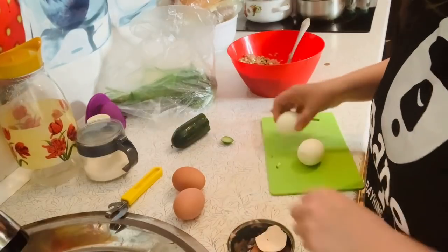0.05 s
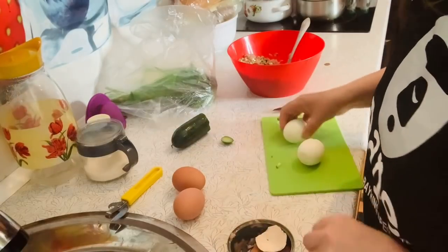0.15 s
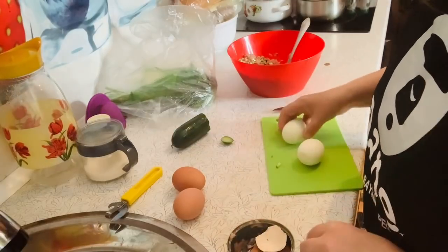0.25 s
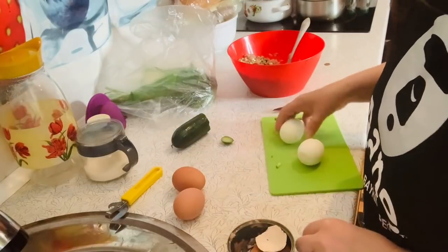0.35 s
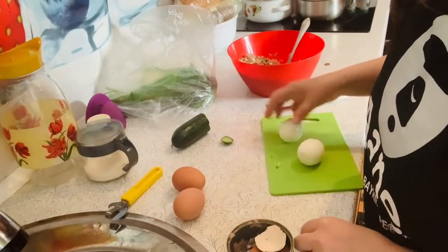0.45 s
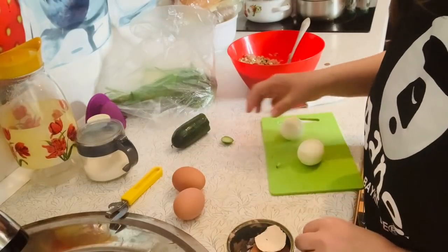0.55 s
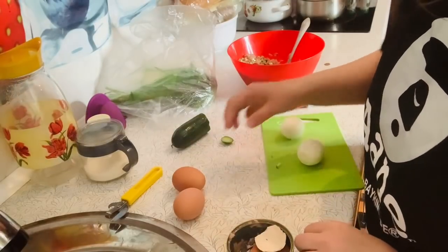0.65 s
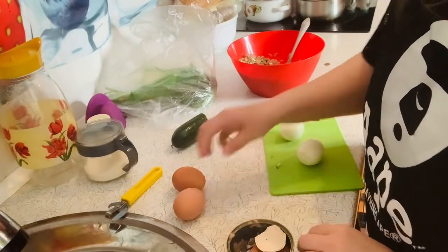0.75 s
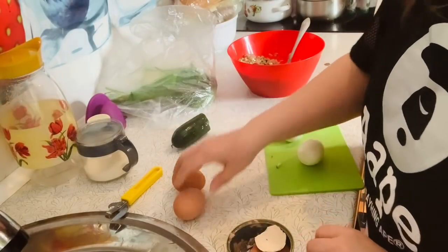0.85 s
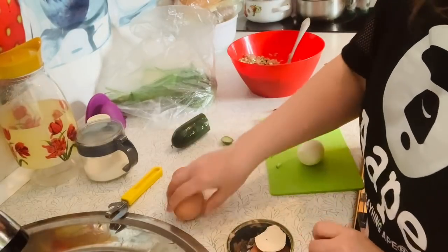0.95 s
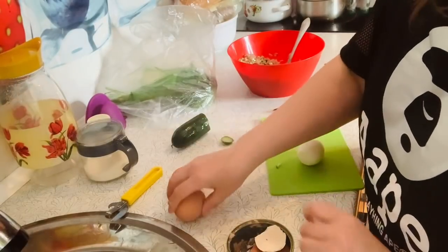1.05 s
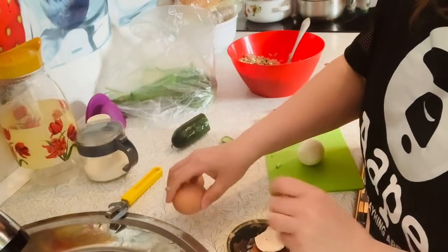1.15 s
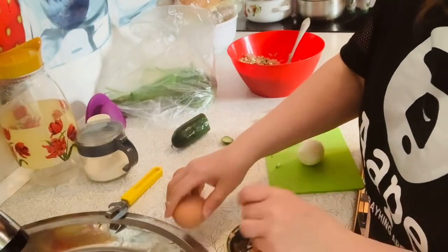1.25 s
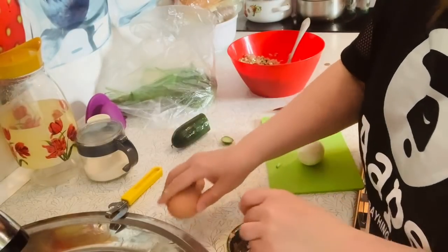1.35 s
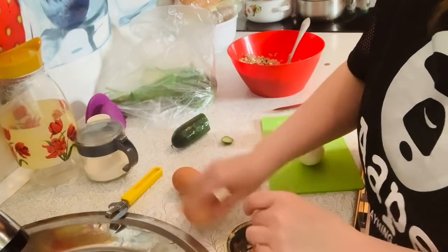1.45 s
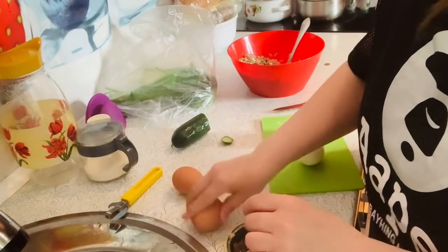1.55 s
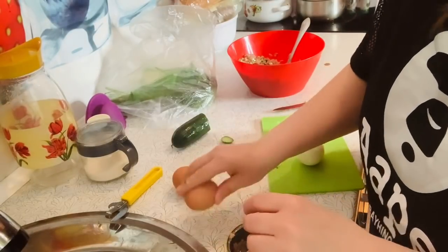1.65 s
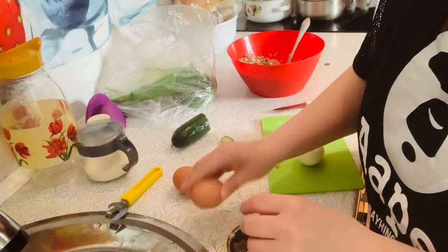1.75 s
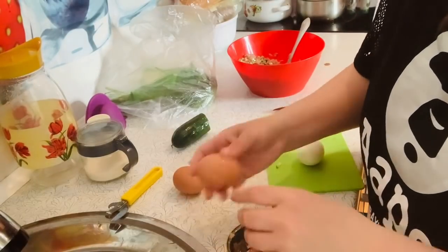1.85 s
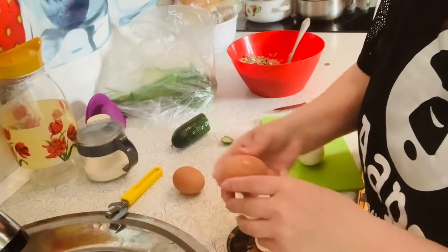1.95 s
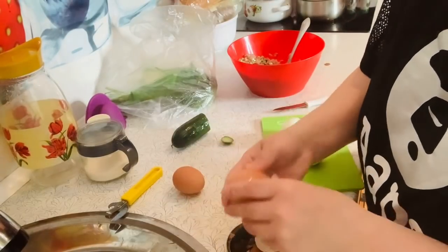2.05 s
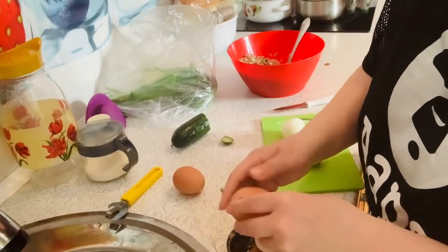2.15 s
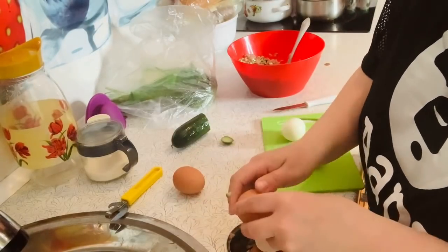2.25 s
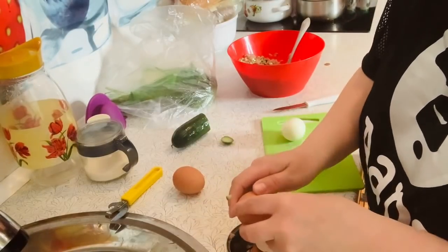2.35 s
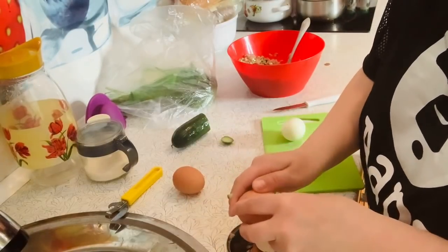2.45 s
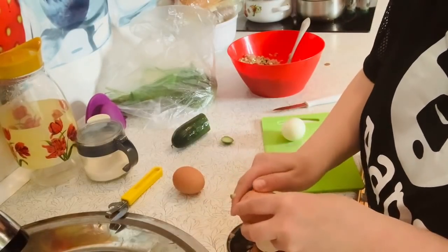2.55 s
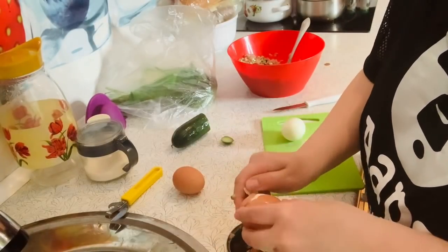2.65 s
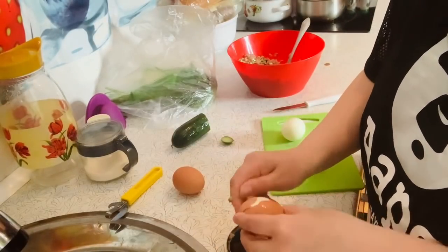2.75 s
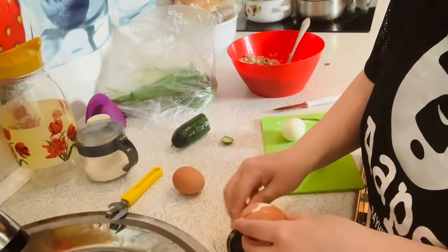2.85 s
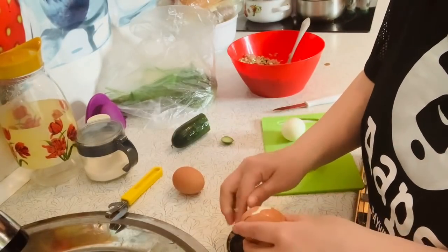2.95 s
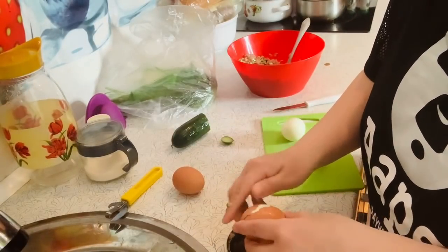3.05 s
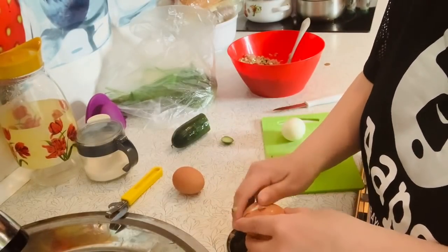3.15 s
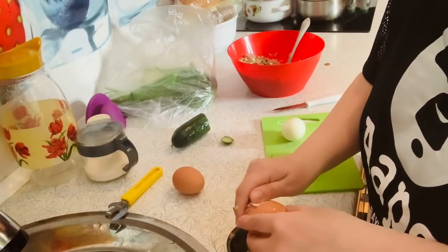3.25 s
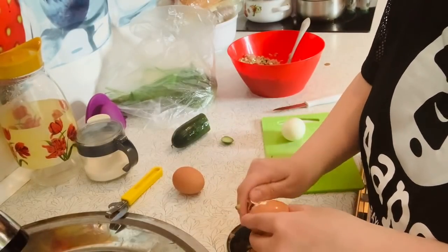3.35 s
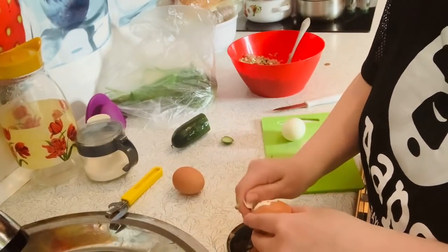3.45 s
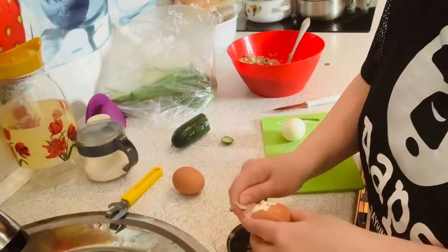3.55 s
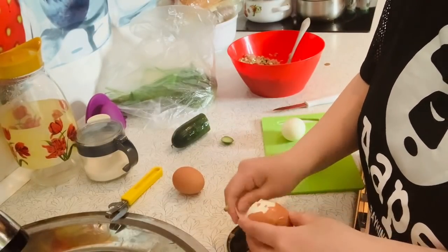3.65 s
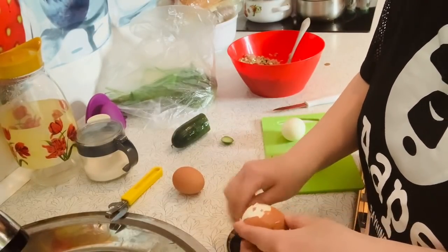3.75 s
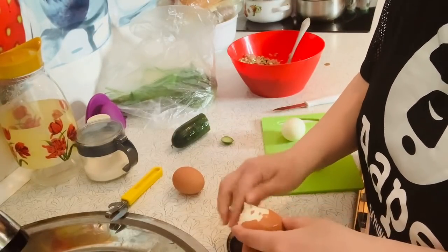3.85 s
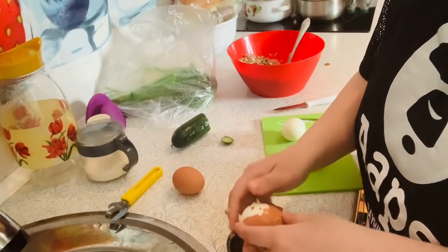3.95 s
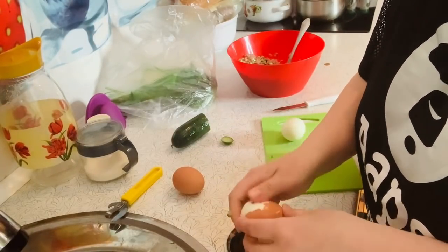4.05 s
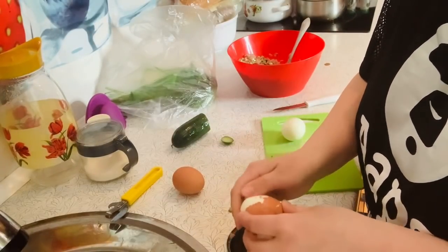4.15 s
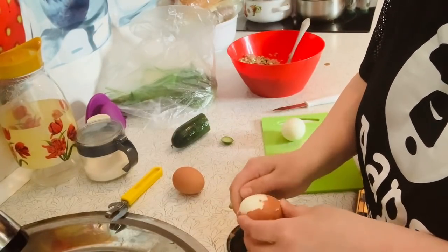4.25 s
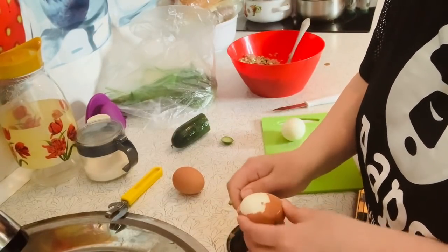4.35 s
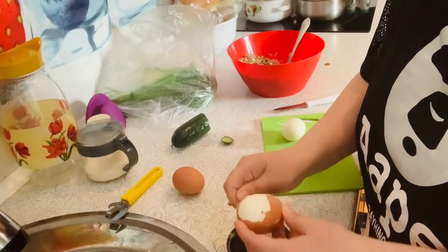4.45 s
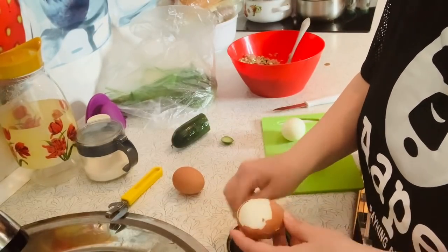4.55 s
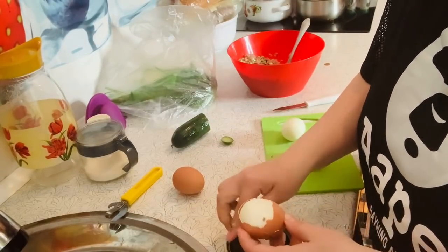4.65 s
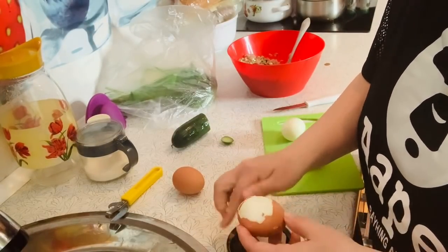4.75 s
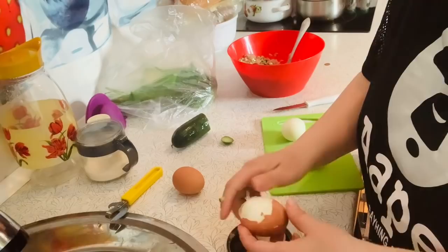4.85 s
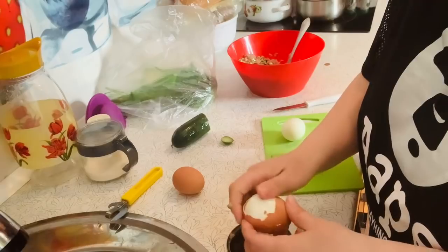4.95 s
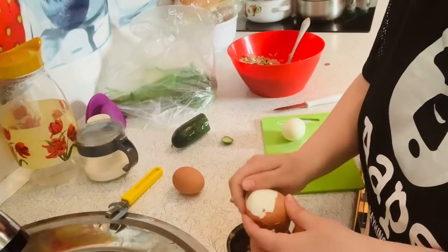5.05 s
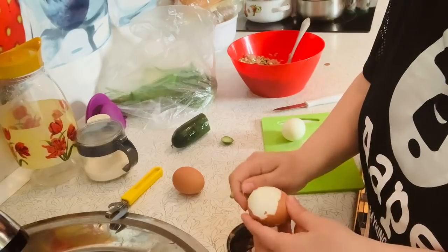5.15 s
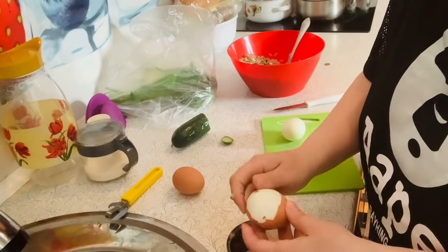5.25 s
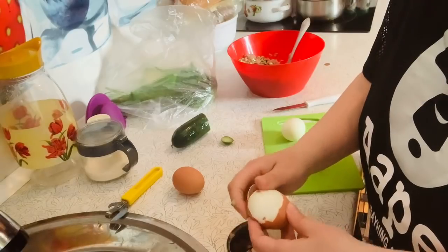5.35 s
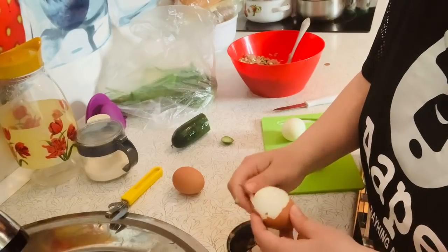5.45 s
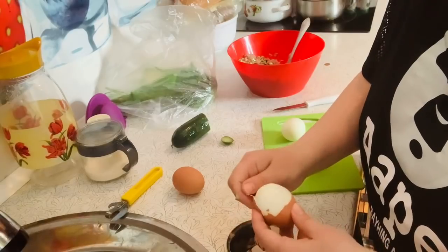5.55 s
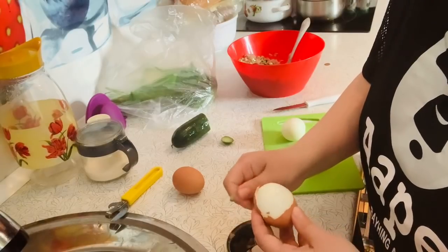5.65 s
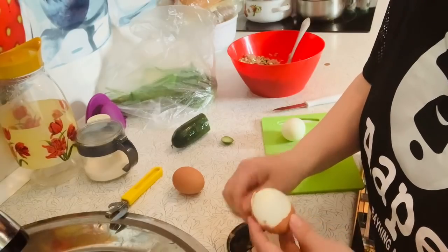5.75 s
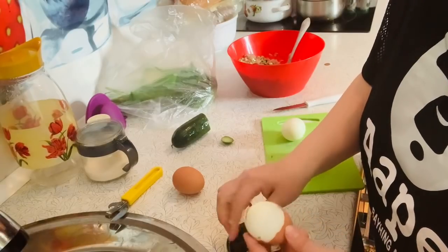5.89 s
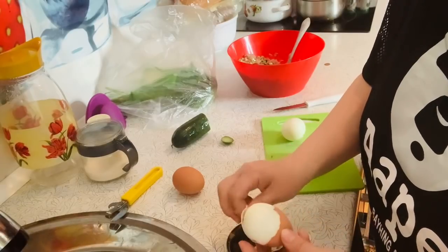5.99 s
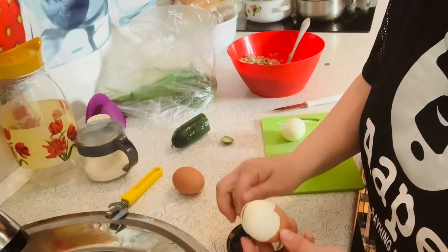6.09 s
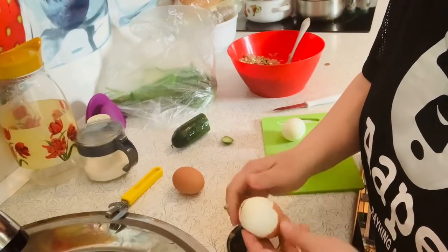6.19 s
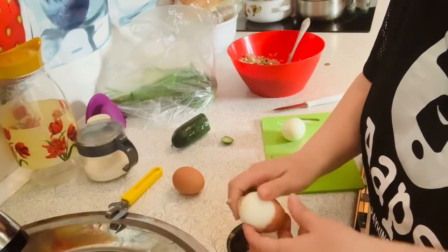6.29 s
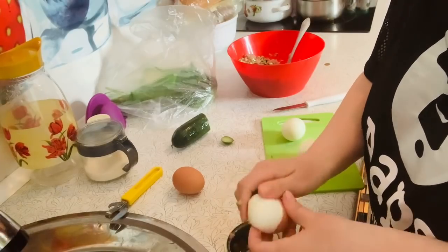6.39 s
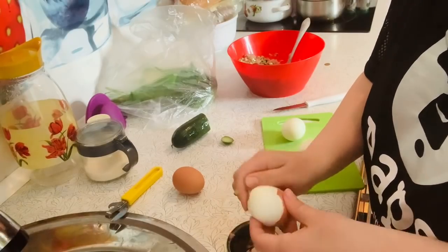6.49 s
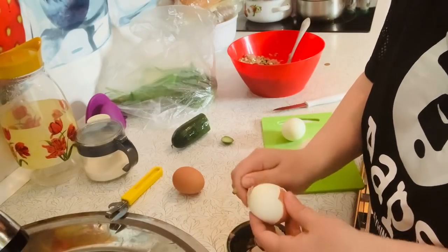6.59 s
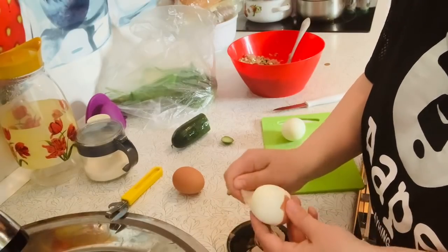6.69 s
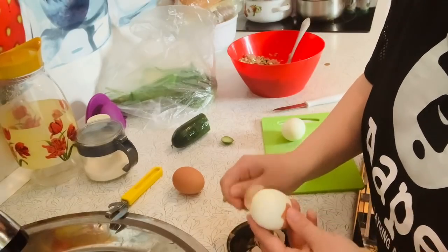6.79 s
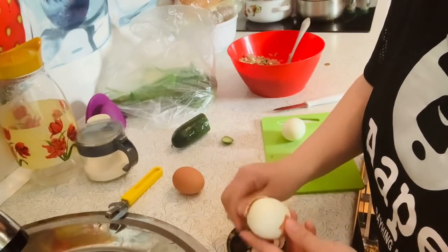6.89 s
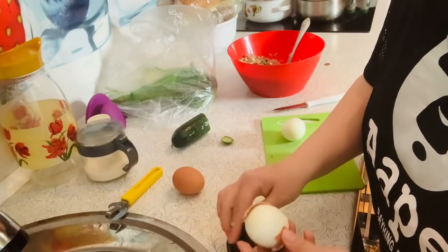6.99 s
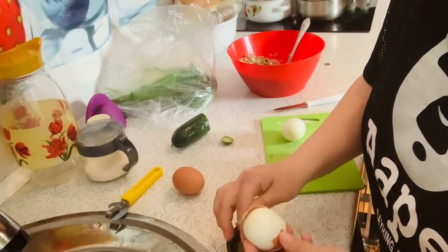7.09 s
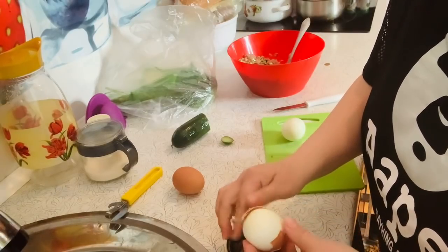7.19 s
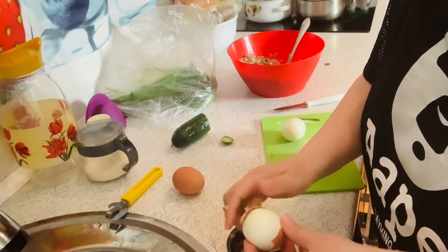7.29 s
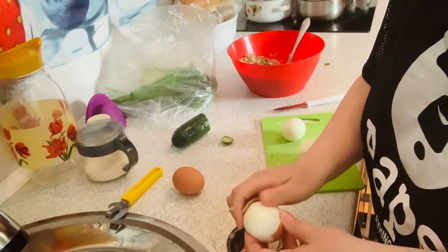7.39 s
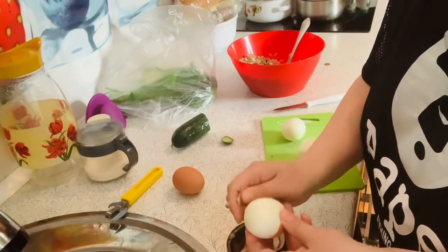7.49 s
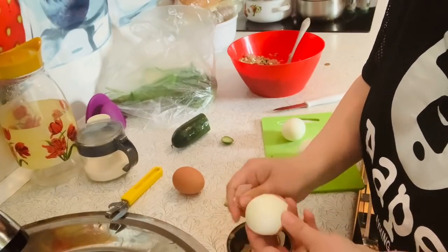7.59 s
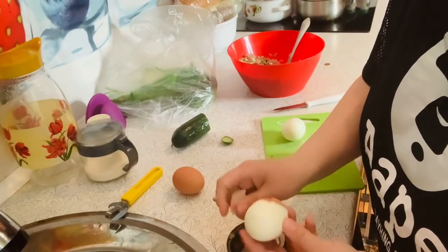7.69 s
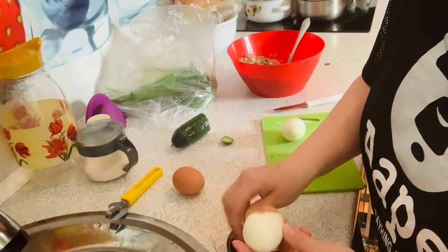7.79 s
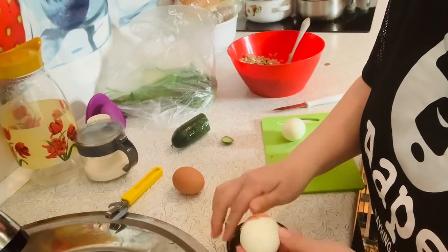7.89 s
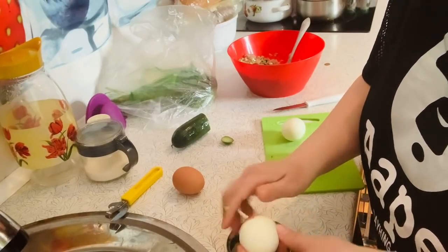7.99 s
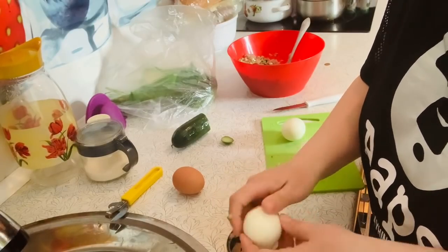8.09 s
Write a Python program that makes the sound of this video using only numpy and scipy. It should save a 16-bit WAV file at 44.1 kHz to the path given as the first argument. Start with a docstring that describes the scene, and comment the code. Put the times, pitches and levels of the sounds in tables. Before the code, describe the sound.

Hands peel a boiled egg near a stereo microphone. Muted thuds on the countertop lead to a single crack against it with a low, short thump. Bright, brittle crackling follows, thickest soon after the knock, then thinning into scattered snaps and faint membrane rustle. Shell fragments patter lightly into a small dish. Short room reflections and a quiet appliance drone surround everything.

```python
"""A hard-boiled egg is knocked once on a kitchen counter and peeled by hand, close to the listener.
Brittle fracture makes the sounds: decaying noise bursts excite the shell's treble, loose flakes and the egg.
Tearing the membrane is a sparse train of random impulses, and bits of shell fall into a ringing dish.
Damped modes give the counter and egg their tone; brushing hands are swelling, filtered noise.
A small kitchen scatters and reverberates the sounds of the hands, over a low, steady hum."""
import sys
import numpy as np
from scipy import signal
from scipy.fft import rfft, irfft
from scipy.io import wavfile

SR = 44100
rng = np.random.default_rng(int(sys.argv[2]) if len(sys.argv) > 2 else 0)


def bounce(signal):
    """Save signal as a 16-bit WAV file at the path given by the first command-line argument."""
    frames = np.transpose(np.atleast_2d(signal))
    limited = np.clip(frames, -1, 1)
    pcm = np.round(limited * 32767).astype(np.int16)
    wavfile.write(sys.argv[1], SR, pcm)


N = 358533
T = np.arange(N) / SR

# Levels in the tables come before the layer gains set in scene().
# shell snaps and fingernail taps: (time [s], treble level [dB], flake ring [dB re treble],
# egg body [dB re treble], flake resonance [Hz], nominal length [s])
SNAPS = [(1.3024, -39.5, -13, -28, 6740, 0.00045), (1.313, -30, -6.5, -39, 6240, 0.0028),
         (2.4601, -47.5, -5.5, 0.5, 5620, 0.0018), (2.5287, -43.5, -18, -14, 5010, 0.0027),
         (2.554, -34.5, -11, -8, 5060, 0.0039), (2.582, -30, -22, -7, 6550, 0.001),
         (2.7546, -54.5, -5.5, 0, 6370, 0.0019), (2.8206, -47.5, -30, -29.5, 5050, 0.00013),
         (3.245, -35.5, -12, -5, 6940, 0.0046), (3.263, -39.5, -12, -0.5, 3500, 0.0022),
         (3.282, -39.5, -27, -2, 6500, 0.00069), (3.292, -32, -32, -4, 5970, .0014),
         (3.3192, -34.5, 1, -1, 3600, 0.0012), (3.3324, -34.5, -5, -1, 3440, 0.0041),
         (3.355, -30.5, -8, -8, 3440, 0.00095), (3.362, -36, -9.5, 4, 3450, 0.0053),
         (3.485, -38.5, -9.5, 1.5, 4700, 0.007), (3.5, -39, -12, -8.5, 5000, 0.00055),
         (3.543, -46, -24, -22, 5120, 0.0013), (3.565, -40, -22, -40, 6100, 0.0016),
         (3.663, -53.5, -9, -26.5, 6550, 0.0019), (3.812, -43.5, -11.5, 4.5, 6430, 0.0011),
         (3.877, -47.5, -4, 1, 5950, 0.003), (4.129, -43.5, -6, -9.5, 4830, 0.0044),
         (4.1423, -35.5, 5.5, -3.5, 5000, 0.00051), (4.173, -32.5, -19, -26.5, 4700, 0.01),
         (4.215, -43, -23, -33, 5170, .0014), (4.371, -50, -8, -3, 6760, 0.0011),
         (4.432, -62, -4, -30, 6400, .0003), (4.5614, -69, 15.5, -30.5, 5470, 0.0015),
         (4.644, -43.5, 0.5, 5, 5530, 0.0026), (5.003, -46.5, -28, -37, 5330, 0.00078),
         (5.033, -42, -10, -21, 5150, 0.011), (5.0417, -30.5, -4, -20, 5200, 0.0038),
         (5.1065, -44.5, -0.5, -2.5, 6060, 0.012), (5.347, -54.5, 4.5, 3, 5680, 0.0017),
         (5.385, -45.5, 11.5, -29.5, 5860, 0.0017), (5.485, -35.5, -19, -44, 7300, 0.0059),
         (5.6955, -68, 13, -16, 6000, 0.0015), (5.8496, -48, -15, -14.5, 5370, 0.0072),
         (5.861, -39, -3.5, -6, 6030, 0.0034), (6.105, -59, -8, -0.5, 6740, 0.0017),
         (6.158, -66, 8.5, -35, 6600, 0.0014), (6.289, -63, -24, -30, 6680, 0.0012),
         (6.31, -55, -32, -37, 6800, 0.00039), (6.3296, -43.5, -14, -36, 6440, 0.0002),
         (6.391, -57, 13.5, -35, 6860, 0.002), (6.363, -44.5, -9, -29, 6360, 0.0077),
         (6.44, -38.5, -8.5, -4, 7140, 0.0055), (6.65, -45, -4, -18, 6070, 0.0035),
         (7.2704, -53, -2, -2.5, 6650, 0.0013), (7.405, -55.5, -2, -8, 6050, 0.0012),
         (7.538, -47.5, -20, -42.5, 5500, 0.00098), (7.7575, -57.5, -30.5, -24, 6100, 0.00016),
         (7.819, -42.5, -26, -18, 6770, 0.00045)]
# bits of shell landing in the dish: (time [s], level [dB], treble [dB re level])
DROPS = [(3.003, -36.5, -3), (3.012, -37, 2.5), (3.0794, -44, -30), (7.0576, -37, -9), (7.0809, -38.5, -10),
         (7.133, -48, -5), (7.8389, -48, -3.5), (7.8477, -39, -11), (7.8518, -45.5, 7.5), (7.8957, -57, 11)]
# soft bumps of hands and peeled eggs on the counter: (time [s], level [dB re the unscaled swing])
BUMPS = [(0.139, -43), (0.178, -33.5), (0.477, -37), (0.782, -47.5), (.99, -42)]
# hands and cloth brushing the counter: (time [s], level [dB], length [s])
BRUSHES = [(0.021, -65, 0.29), (0.4, -67.5, 0.18), (0.754, -64, 0.088), (2.018, -61, 0.062)]
# thumb pulls and rubs: (time of greatest force [s], build-up [s], let-go [s], treble level [dB],
# flake ring [dB re treble], egg body [dB re treble])
PULLS = [(.02, 0.13, 0.17, -65, -14, -21), (.93, 0.023, 0.033, -74, -13, -18),
         (1.22, 0.17, 0.057, -77.5, -13, -15), (1.98, 0.064, .07, -81.5, -24, 11),
         (2.321, 0.13, .07, -60.5, -3, 4.5), (2.575, 0.06, 0.014, -38.5, 0.5, 0),
         (3.351, 0.2, 0.04, -35.5, -9.5, 0.5), (3.498, 0.034, 0.032, -39, -4.5, -11),
         (3.585, .03, 0.06, -46, -19, -21.5), (4.177, 0.07, 0.033, -41.5, -7, -7),
         (4.281, 0.046, 0.33, -60, -9, -12), (4.92, 0.042, .08, -59, -12.5, -30),
         (5.049, 0.064, 0.074, -51, -2, -13), (5.402, 0.1, 0.097, -44, -5.5, -9.5),
         (5.505, 0.018, 0.12, -52.5, -13, -20), (5.6, 0.028, 0.046, -51.5, -10.5, -20),
         (5.741, 0.099, 0.035, -62, -13, -23), (5.871, 0.019, 0.017, -39, -15.5, -5.5),
         (6.248, 0.027, 0.0093, -60.5, -28.5, -29), (6.43, 0.1, 0.071, -45, -12.5, -25),
         (6.56, 0.1, 0.096, -50, -4.5, -1), (6.8, 0.049, 0.041, -64.5, -7.5, -17),
         (7.53, 0.27, 0.1, -55.5, -16, -32.5)]

# modes of the struck egg and the spot under it: (frequency [Hz], relative level [dB], t60 [s])
EGG_MODES = [(390, -10, .1), (435, -6, .12), (540, -7, .1), (693, -15, .06), (1066, -8, .05),
             (1180, -4, .035), (1350, 1, .04), (1480, 0, .04), (1610, -2, .07), (1780, 2, .025),
             (2000, 9, .035), (2085, -7, .08), (2200, 3, .02), (2380, -3, .02)]
# modes of the counter top: (frequency [Hz], relative level [dB], t60 [s])
COUNTER_MODES = [(61, -32.5, 0.13), (92, -14, 0.26), (96.46, -40.5, 0.95), (107.6, -13.5, 0.14),
                 (208.4, -25, 0.093), (222, -28.5, .08)]
# modes of the dish: (frequency [Hz], relative level [dB], t60 [s])
DISH_MODES = [(1800, 0, .027), (2650, 1, .008), (3600, 3, .006), (5200, 2, .004)]

# bright spectrum of breaking shell: (frequency [Hz], relative level [dB])
SHELL_TREBLE = [(60, -40), (500, -23), (1000, -19), (3000, -13), (6000, -9), (7400, -5), (8300, 0),
                (9600, 0), (11800, -3), (14000, -2), (15500, -6)]
# duller response of the egg under the shell: (frequency [Hz], relative level [dB])
EGG_BODY = [(50, -38.5), (300, -16), (600, -21.5), (1000, -11), (1400, -4), (1800, -10), (2400, 2.5),
            (3200, 3.5), (4500, -5), (9000, -45.5)]
# spectrum of the shell caving in: (frequency [Hz], relative level [dB])
CRUSH = [(30, -38.5), (200, -16), (450, -2.5), (800, -5.5), (1300, -6), (2000, -0.5), (2900, -4),
         (4000, -9.5), (5300, -7.5), (7200, -13.5), (8500, -11.5), (11000, -11.5), (16000, -15.5)]
# spectrum of bits skittering in the dish: (frequency [Hz], relative level [dB])
CLATTER = [(50, -46), (300, -22), (650, -5.5), (1200, -6.5), (1800, -7), (3300, 3), (5300, 4.5), (7000, 4),
           (10000, -5)]
# spectrum of the room's low rumble: (frequency [Hz], relative level [dB])
ROOM_RUMBLE = [(30, -27.5), (65, -4), (95, -1), (130, -1.0), (250, -18.5), (600, -49.5)]
# dull spectrum of brushing: (frequency [Hz], relative level [dB])
BRUSH_DULL = [(150, 9.0), (400, -1.0), (800, -7.5), (1500, -12), (2500, -60), (9000, -56.5)]
# steady room noise: (frequency [Hz], spectral density [dB per Hz])
HUM = [(20, -101.5), (45, -92.5), (95, -85), (170, -90), (230, -88.5), (280, -97), (350, -90.5),
       (450, -100), (800, -108), (1500, -117), (2500, -121), (8000, -124), (14500, -123), (16000, -135)]
# kitchen reverberation: (frequency [Hz], t60 [s])
KITCHEN = [(100, 0.21), (500, 0.43), (2000, 0.32), (4000, 0.25), (8000, 0.25), (15000, 0.2)]

KNOCK_S = 1.4557
TOP_HZ = 15400
# the crackle swells by BUILD_DB as a pull tightens and sinks by RELAX_DB as it lets go;
# the thumb lands and lifts in TOUCH_S
BUILD_DB, RELAX_DB, TOUCH_S = 19.5, 17.5, 0.024
# chips breaking off: mean gap, level before the pull's force, its spread, and decay time of each crack
CHIP_GAP_S, CHIP_DB, CHIP_SPREAD_DB, CHIP_S = .02, -3.5, 2.5, .0005


def undb(db):
    """Amplitude ratio: twenty decibels make a factor of ten."""
    return 10 ** (np.asarray(db) / 20)


def unit(x):
    """Energy normalisation: the squares sum to one."""
    return x / np.sqrt(np.sum(x ** 2) + 1e-18)


def add(out, s, x):
    """Superposition: mix x into out from time s."""
    start = max(int(s * SR), 0)
    out[start:start + len(x)] += x[:max(N - start, 0)]


def through(x, response):
    """Linear filtering: convolve x with an impulse response, keeping the length of x."""
    return signal.fftconvolve(x, response)[:len(x)]


def along(points, hz):
    """Interpolate (Hz, value) points linearly on a log-frequency axis."""
    f, value = np.transpose(points)
    return np.interp(np.log(np.maximum(hz, 1)), np.log(f), value)


def colour(points, size=1024):
    """Minimum phase: folding the cepstrum gives a causal response of unit energy with this spectrum."""
    level_db = along(points, np.fft.rfftfreq(size, 1 / SR))
    cepstrum = irfft(np.log(undb(level_db)))
    cepstrum[1:size // 2] *= 2
    cepstrum[size // 2 + 1:] = 0
    return unit(irfft(np.exp(rfft(cepstrum))))


def ring(modes, size=16384):
    """Modal superposition: a struck object sounds as a sum of exponentially decaying sines."""
    t = T[:size]
    return sum(undb(db - 60 * t / t60) * np.sin(2 * np.pi * hz * t) for hz, db, t60 in modes)


def fracture(length, scatter_db, size=4096):
    """Brittle fracture: a crack builds up quickly, then decays in ever smaller breaks of uneven size."""
    age = T[:size] / max(length, 1e-4)
    unevenness = undb(scatter_db * np.clip(rng.standard_normal(size), -2, 2))
    breaks = rng.standard_normal(size) * unevenness
    return unit(breaks * np.exp(-age) * (1 - np.exp(-2 * age)))


def burst(x, response, db):
    """Transient response: x excites a filter; db is the RMS level over a hundredth of a second."""
    return unit(through(x, response)) * undb(db) * np.sqrt(SR / 100)


def wander(per_s):
    """Slow random modulation: straight lines join independent Gaussian values, per_s of them a second."""
    knots = rng.standard_normal(int(N / SR * 60) + 2)  # enough for rates up to 60 per second
    return np.interp(T * per_s, np.arange(len(knots)), knots)


def hum(level_db, motor_db, motor_hz, left_db):
    """Stationary noise: low room noise, a narrow-band wavering appliance drone, and stereo difference."""
    hz = np.fft.rfftfreq(N, 1 / SR)
    shape = undb(along(HUM, hz) + level_db) * np.sqrt(SR / 2)  # density per Hz to white-noise gain
    mid, side, motor = rfft(rng.standard_normal((3, N)))
    mid = irfft(mid * shape, N)
    # the channels differ less at low frequencies
    side = irfft(side * shape * np.clip(hz / 400, .3, 1), N)
    motor = irfft(motor / (1 + ((hz - motor_hz) / 9) ** 2), N)
    both = mid + undb(motor_db + 2 * wander(1.4)) * motor / motor.std()
    return np.array([both * undb(left_db) + side, both * undb(-left_db) - side])


def effort(peak, build, let_go):
    """Loading and release: the force of a pull tightens until the shell gives, then slackens."""
    before, after = np.maximum(peak - T, 0), np.maximum(T - peak, 0)
    touch = np.clip(np.minimum(build - before, let_go - after) / TOUCH_S + .5, 0, 1)
    return touch * undb(-BUILD_DB * before / build - RELAX_DB * after / let_go)


def chips():
    """Repeated fracture: small chips break off at uneven gaps, each a short crack of its own size."""
    out = np.zeros(N)
    count = int(N / SR / CHIP_GAP_S)
    times = CHIP_GAP_S * (np.arange(count) + rng.random(count))
    for s, size in zip(times, rng.standard_normal(count)):
        crack = fracture(CHIP_S, scatter_db=4, size=512)
        add(out, s, burst(crack, [1], CHIP_DB + CHIP_SPREAD_DB * min(size, 2)))
    return out


def flake(hz):
    """Damped resonance: a loose piece of shell has one broad peak at hz."""
    return colour([(hz / 4, -40), (hz / 2, -16), (.8 * hz, -6), (hz, 0), (1.2 * hz, -6), (2 * hz, -26)])


def peeling(rub, crackle_db, treble_db, flake_db, body_db):
    """Crackling noise: the membrane tears in many random tiny breaks and chips while the thumb rubs."""
    bright, loose, egg = np.zeros((3, N))
    for peak, build, let_go, db, ring_db, egg_db in PULLS:
        pull = effort(peak, build, let_go) * undb(db)
        bright += pull
        loose += pull * undb(ring_db)
        egg += pull * undb(egg_db)

    per_s, surge_db, shift_db = 600, 1.8, 2  # mean break rate, spread of crackle and flake levels
    size = undb(6 * np.clip(rng.standard_normal(N), -2, 1.8))
    breaks = (rng.random(N) < per_s / SR) * rng.choice([-1, 1], N) * size
    rubbing = rub * rng.standard_normal(N)
    crackle = undb(crackle_db + surge_db * wander(50)) * (breaks / breaks.std() + rubbing)
    force = crackle + chips()

    # as the loose flake grows and is gripped anew, its resonances take turns
    flakes = np.zeros(N)
    for hz in (4400, 5300, 6200):
        grip = undb(flake_db + shift_db * wander(25))
        flakes += through(force * loose * grip, flake(hz))
    treble = undb(treble_db) * through(force * bright, colour(SHELL_TREBLE))
    body = undb(body_db) * through(force * egg, colour(EGG_BODY))
    return treble + flakes + body


def brushes():
    """Friction noise: dull, filtered noise swells and fades as hands and cloth brush the counter."""
    out, dull = np.zeros(N), colour(BRUSH_DULL)
    for s, db, length in BRUSHES:
        count = int(length * SR)
        swish = through(rng.standard_normal(count), dull)
        add(out, s, undb(db) * np.hanning(count) * swish)
    return out


def counter(thump_db, lag, swell, rumble_db, rumble_t60, size=32768):
    """Inertia: the heavy top takes a moment to swing after a blow; the room's low standing waves rumble on."""
    out, t = np.zeros(N), T[:size]
    standing_waves = through(rng.standard_normal(size), colour(ROOM_RUMBLE, size=8192))
    swing = ring(COUNTER_MODES, size=size) + standing_waves * undb(rumble_db - 60 * t / rumble_t60)
    onset = 1 - np.exp(-(t / swell) ** 2)
    high_pass = signal.butter(2, 50, "high", fs=SR, output="sos")
    swing = signal.sosfilt(high_pass, swing * onset)
    add(out, KNOCK_S + lag, undb(thump_db) * swing)
    for s, db in BUMPS:
        add(out, s, undb(db) * swing)
    return out


def snaps(treble_db, flake_db, body_db):
    """Shared excitation: one crack sounds bright, rings the loose flake and, more dully, the egg."""
    out, treble, body = np.zeros(N), colour(SHELL_TREBLE), colour(EGG_BODY)
    for s, db, loose, egg, hz, length in SNAPS:
        crack = fracture(.7 * length, scatter_db=5)  # decay time is 0.7 of the nominal length
        add(out, s, burst(crack, treble, db + treble_db))
        add(out, s, burst(crack, flake(hz), db + loose + flake_db))
        add(out, s, burst(crack, body, db + egg + body_db))
    return out


def knock(length, crush_db, egg_db):
    """Impact: the shell caves in against the counter and the blow excites the modes of the whole egg."""
    out = np.zeros(N)
    crush = fracture(length, scatter_db=1)
    add(out, KNOCK_S - length / 2, burst(crush, colour(CRUSH), crush_db))
    # neighbouring modes push the air in opposite directions
    egg = sum((-1) ** k * ring([mode]) for k, mode in enumerate(EGG_MODES))
    add(out, KNOCK_S, undb(egg_db) * egg)
    return out


def drops(length, clatter_db, dish_db, treble_db):
    """Impact excitation: bits of shell skitter as they land and briefly ring the dish."""
    out = np.zeros(N)
    # the dish rings only above about 1.3 kHz
    high_pass = signal.butter(3, 1300, "high", fs=SR, output="sos")
    dish = signal.sosfilt(high_pass, ring(DISH_MODES, size=4096))
    for s, db, bright in DROPS:
        landing = fracture(length, scatter_db=-1)
        add(out, s, burst(landing, colour(CLATTER), db + clatter_db))
        add(out, s, burst(landing, colour(SHELL_TREBLE), db + bright + treble_db))
        add(out, s, burst(landing, dish, db + dish_db))
    return out


def scatter(x, t60, size=2048, count=2048):
    """Scattering: short waves bounce off hands, dish and pots, in a pattern that changes as hands move."""
    out, t = np.zeros(N), T[:size]
    x = signal.sosfilt(signal.butter(1, 2200, "high", fs=SR, output="sos"), x)
    fade = np.sqrt(np.hanning(2 * count))  # overlapping pieces keep constant power
    for i in range(0, N, count):
        piece = x[i:i + 2 * count]
        echoes = unit(rng.standard_normal(size) * undb(-60 * t / t60) * (t > .0008))
        add(out, i / SR, signal.fftconvolve(piece * fade[:len(piece)], echoes))
    return out


def kitchen(x, near_db, near_t60, late_db, size=24000):
    """Reverberation: direct sound, near scattering, and wall echoes decaying at a rate set by frequency."""
    t, hz = T[:size], np.fft.rfftfreq(size, 1 / SR)
    centres = np.log([f for f, _ in KITCHEN])
    out = []
    for delay in (4, 0):  # samples: direct sound reaches the right channel first
        noise, late = rfft(rng.standard_normal(size)), 0
        for share, (_, t60) in zip(np.eye(len(KITCHEN)), KITCHEN):
            band = np.interp(np.log(hz + 1), centres, share)
            late = late + irfft(noise * band, size) * undb(-60 * t / t60)
        walls = unit(late * np.minimum(t / 0.0066, 1))  # echoes build up over 6.6 ms
        near = undb(near_db) * scatter(x, near_t60)
        out.append(np.roll(x, delay) + near + undb(late_db) * through(x, walls))
    return np.array(out)


def scene():
    """Superposition of hands and egg in the kitchen, the counter under them and the hum (dB, s, Hz)."""
    shell = snaps(treble_db=-3.5, flake_db=-3.0, body_db=-8.0)
    shell += peeling(rub=0.19, crackle_db=-4, treble_db=-2.0, flake_db=-6.0, body_db=-6.5)
    shell += drops(length=0.0031, clatter_db=0.0, dish_db=-7.5, treble_db=-5.5)
    shell += knock(length=.003, crush_db=-18, egg_db=-22)
    thump = counter(thump_db=-1, lag=0.002, swell=0.0082, rumble_db=-38, rumble_t60=0.74)
    room = kitchen(shell + brushes(), near_db=4.0, near_t60=0.061, late_db=-4.0)
    stronger_left = undb([[2.5], [-3.5]])
    return room + thump * stronger_left + hum(level_db=-1, motor_db=-70.0, motor_hz=221.7, left_db=2.0)


def record(dry):
    """Saturation and band limiting: tanh rounds the peaks and a steep low-pass cuts above TOP_HZ."""
    low_pass = signal.ellip(8, .2, 70, TOP_HZ, fs=SR, output="sos")
    return signal.sosfilt(low_pass, np.tanh(dry))


dry = scene()
out = record(dry)
bounce(out)
```